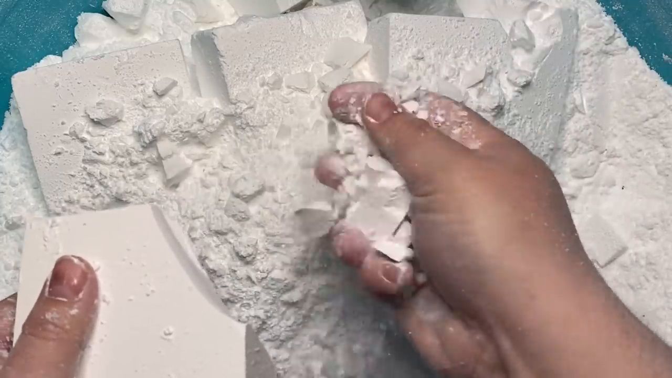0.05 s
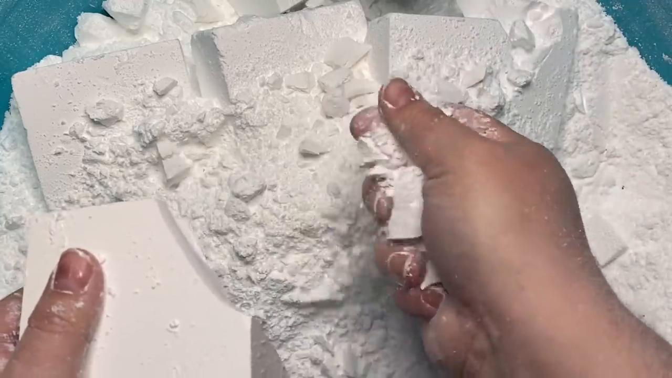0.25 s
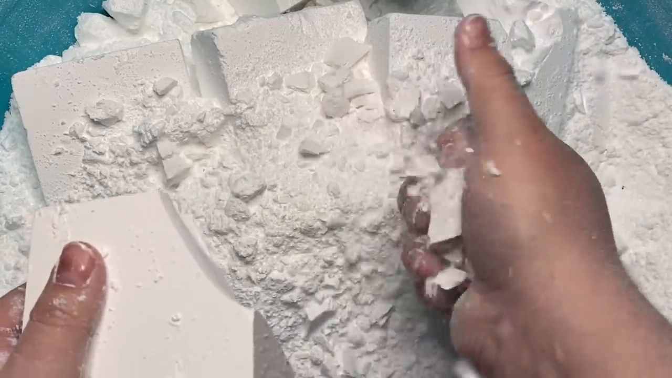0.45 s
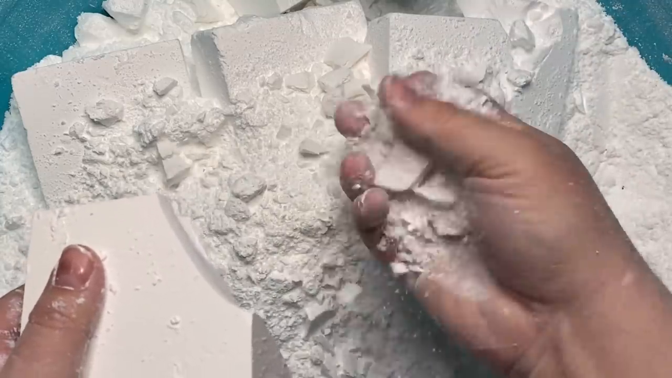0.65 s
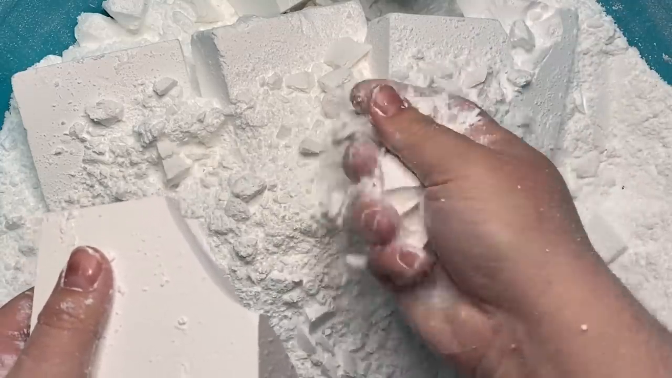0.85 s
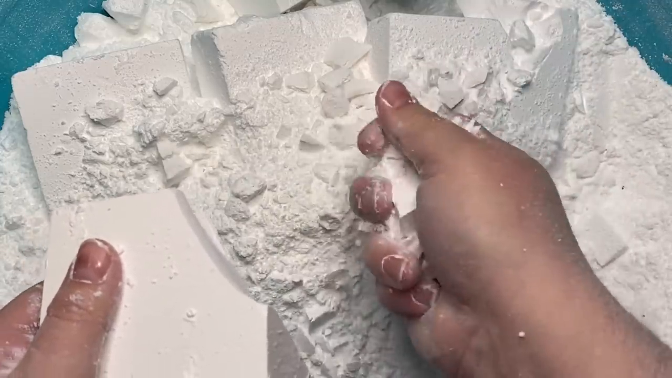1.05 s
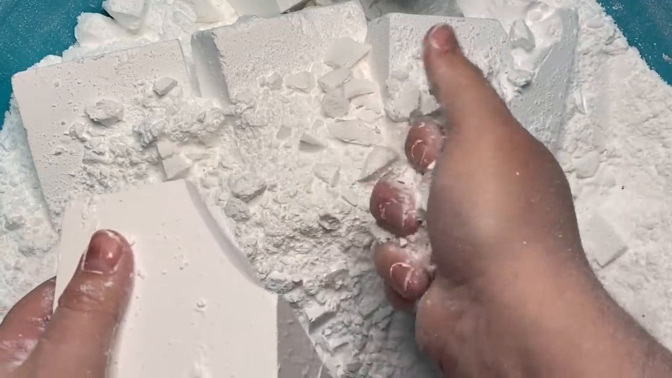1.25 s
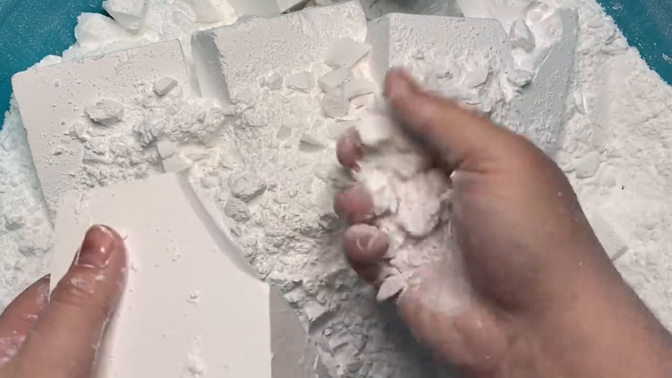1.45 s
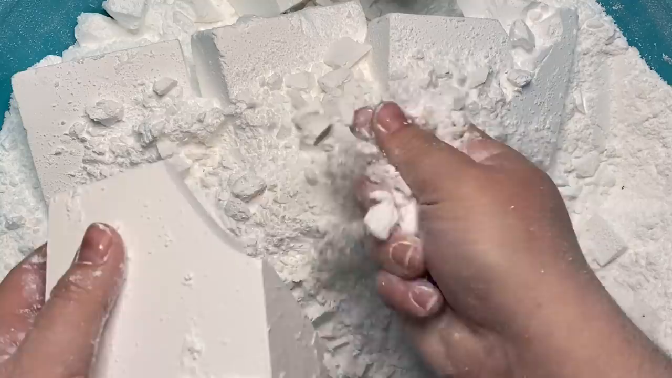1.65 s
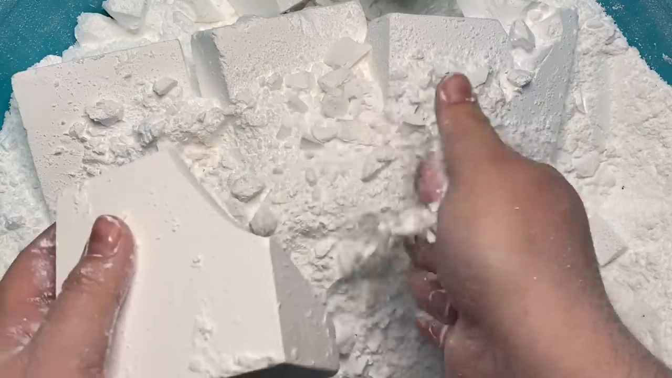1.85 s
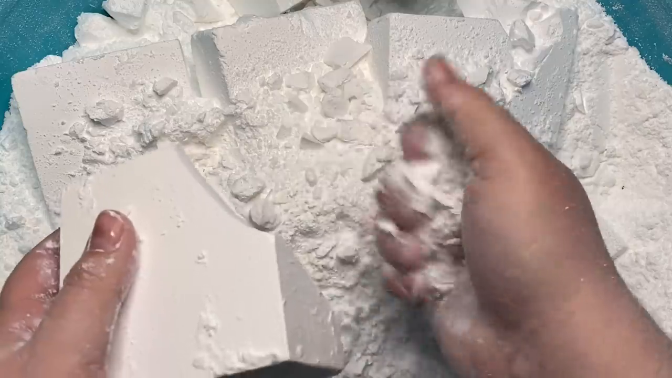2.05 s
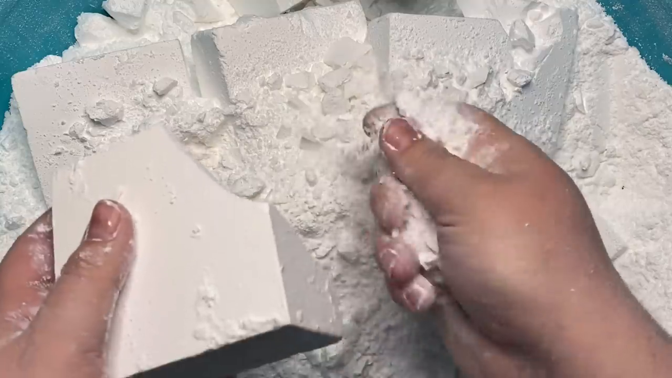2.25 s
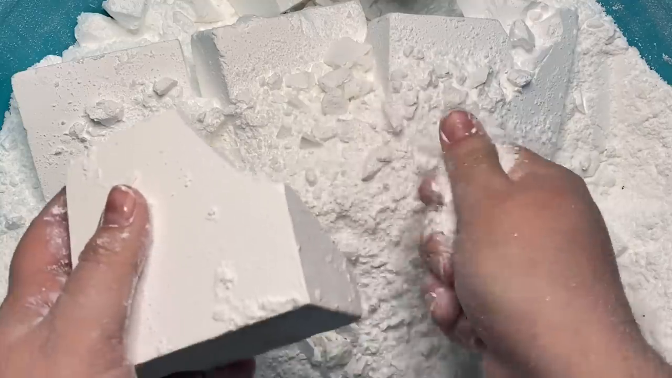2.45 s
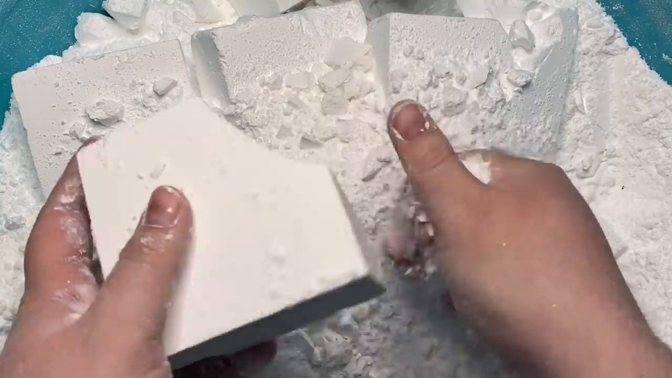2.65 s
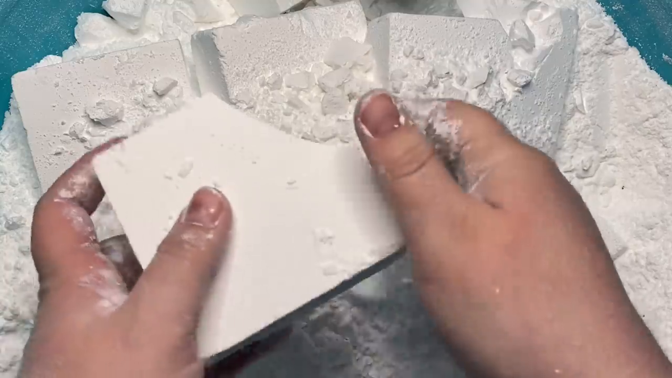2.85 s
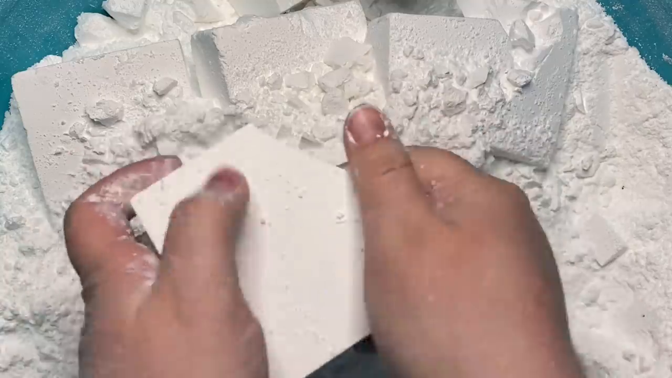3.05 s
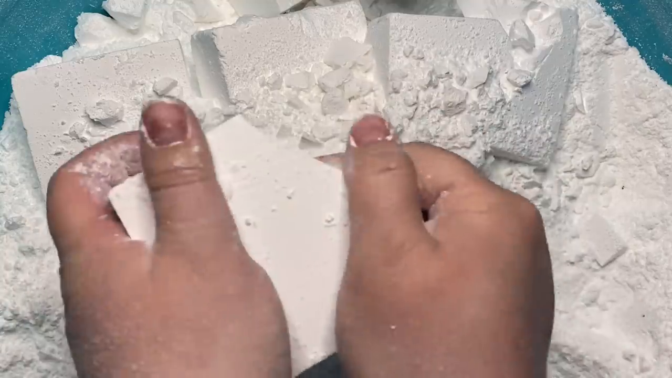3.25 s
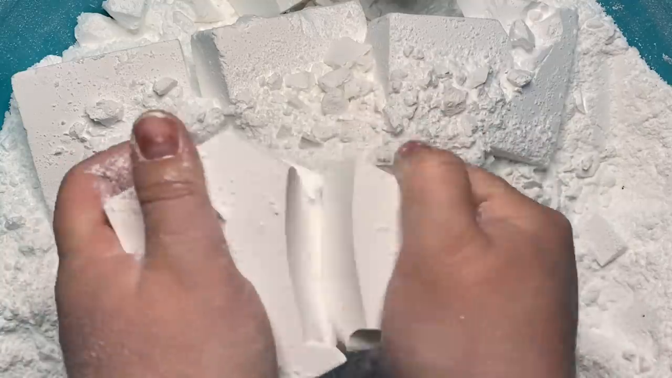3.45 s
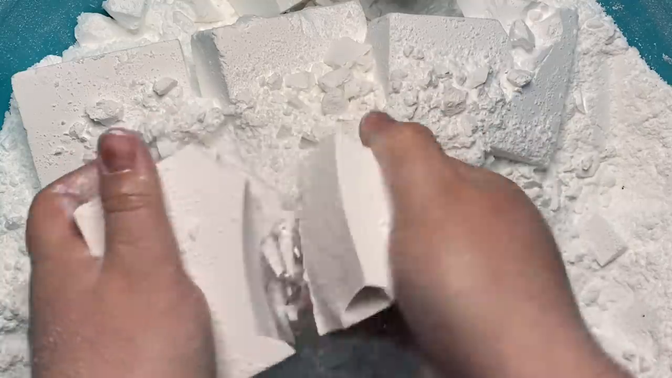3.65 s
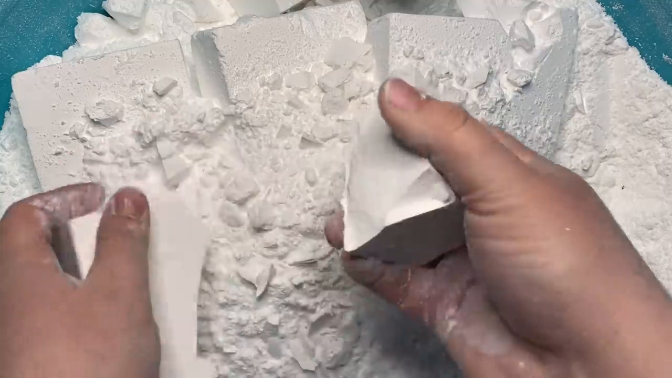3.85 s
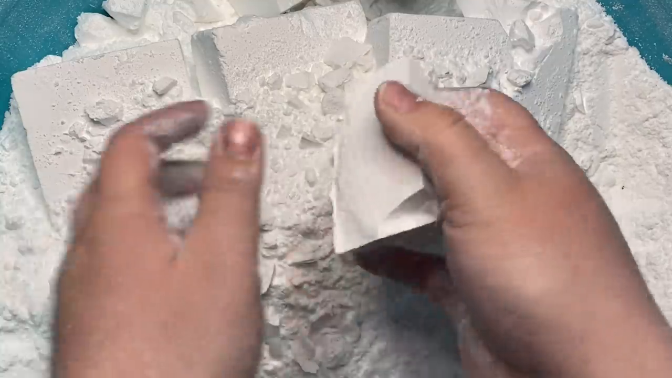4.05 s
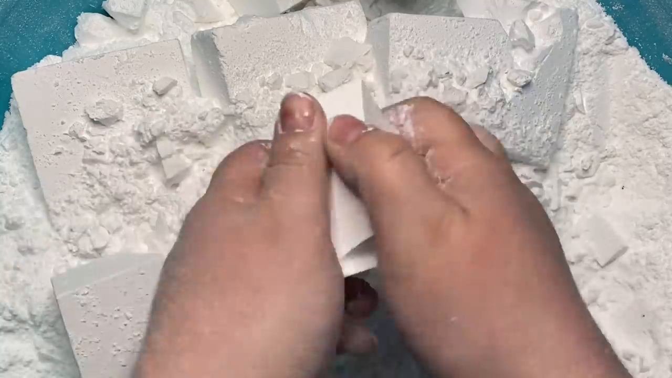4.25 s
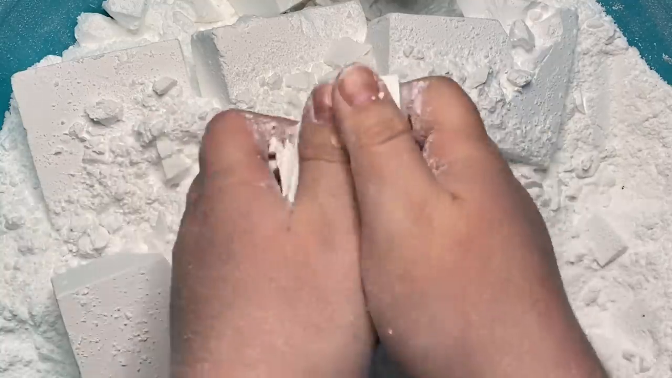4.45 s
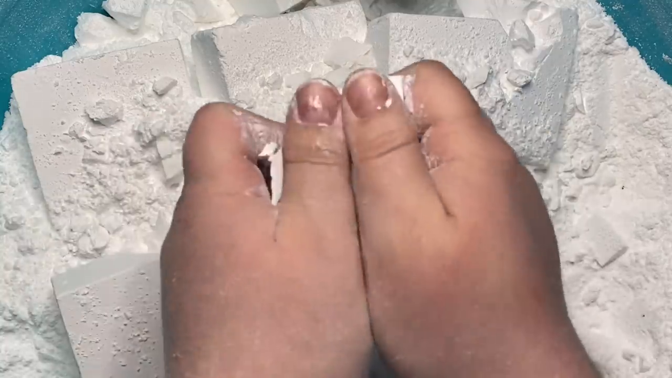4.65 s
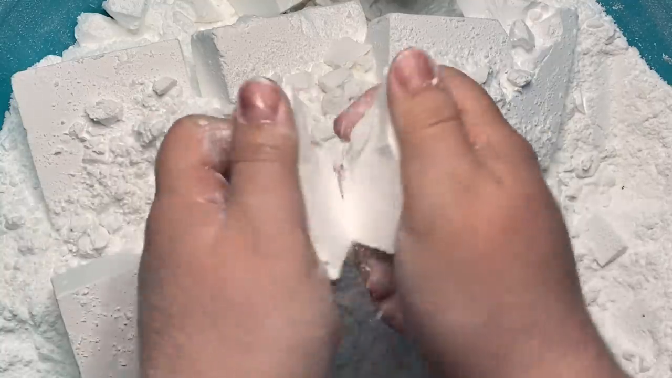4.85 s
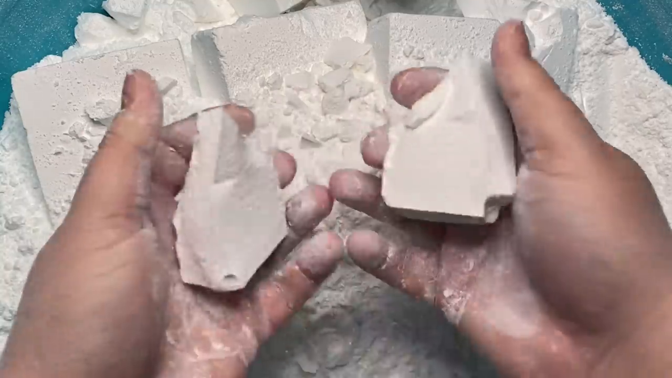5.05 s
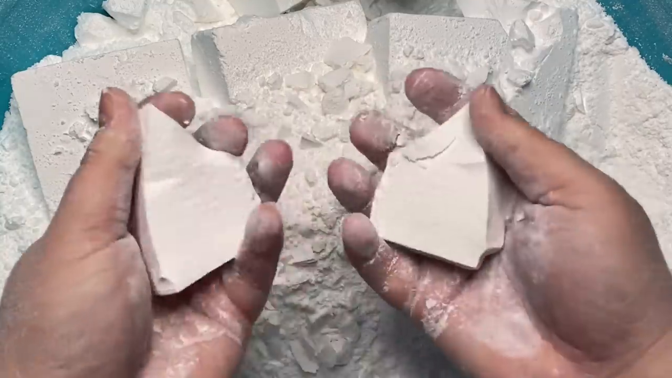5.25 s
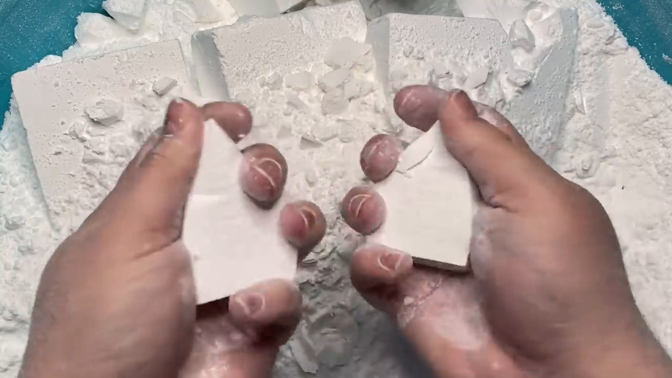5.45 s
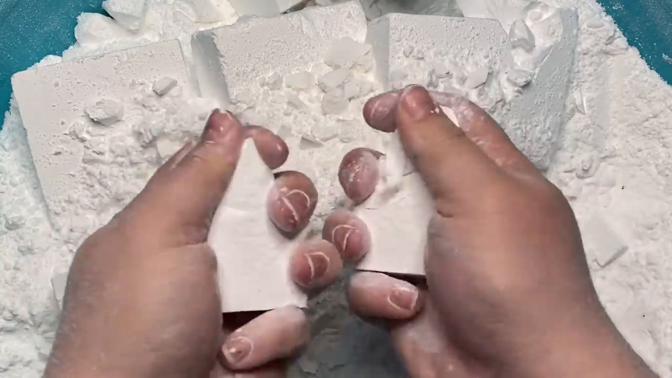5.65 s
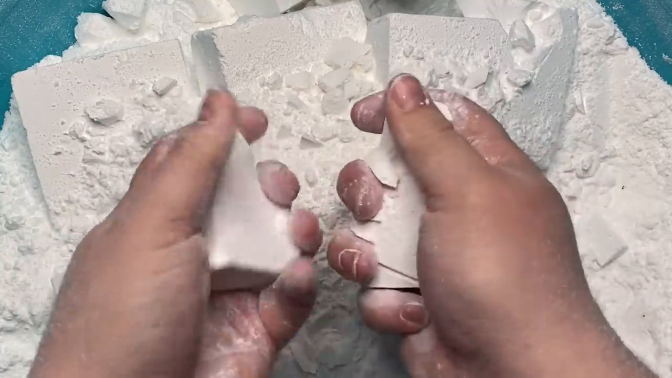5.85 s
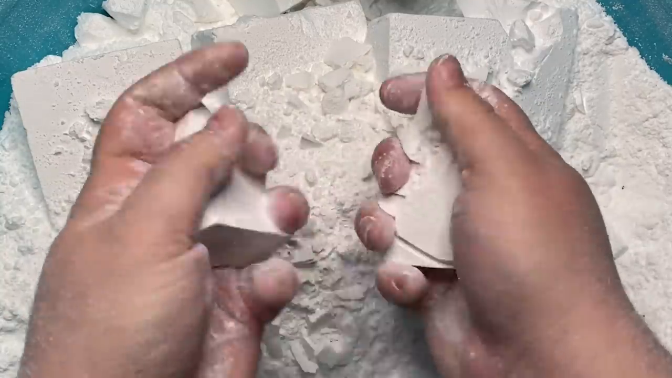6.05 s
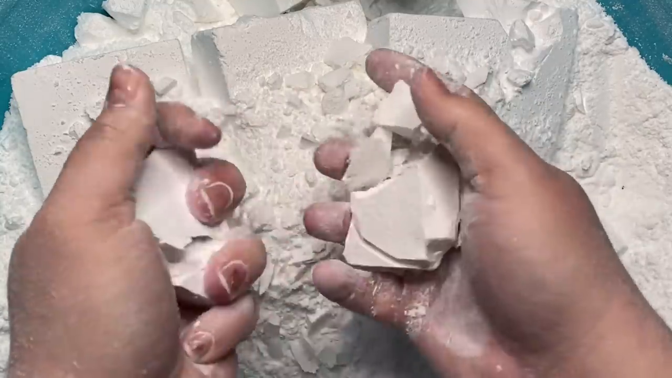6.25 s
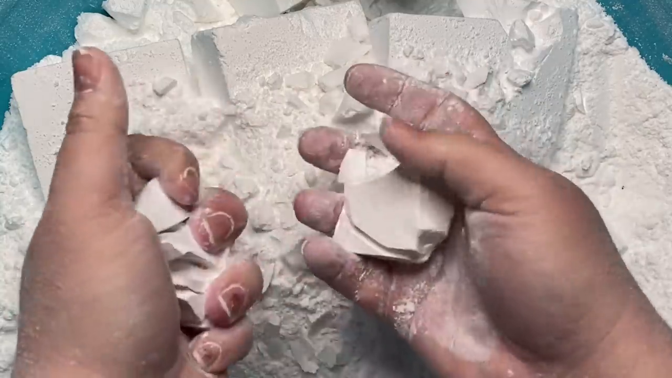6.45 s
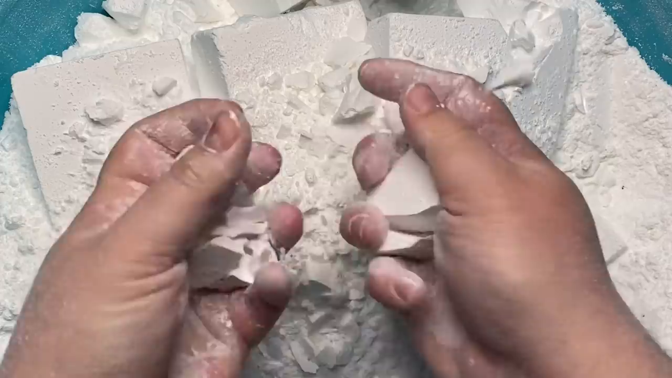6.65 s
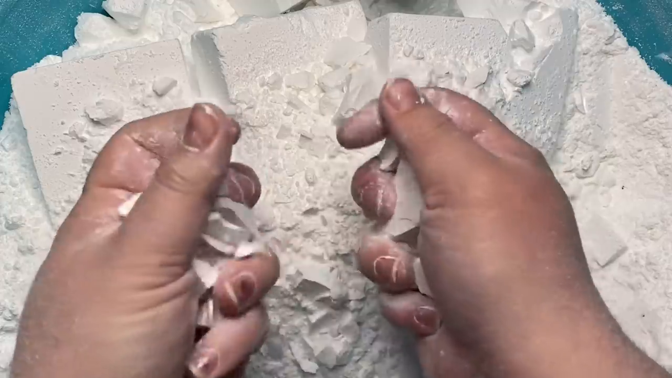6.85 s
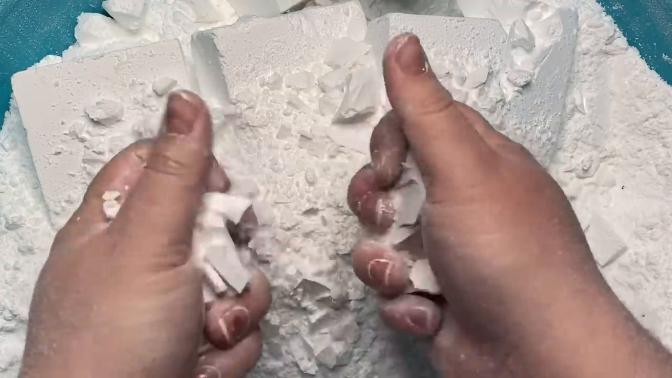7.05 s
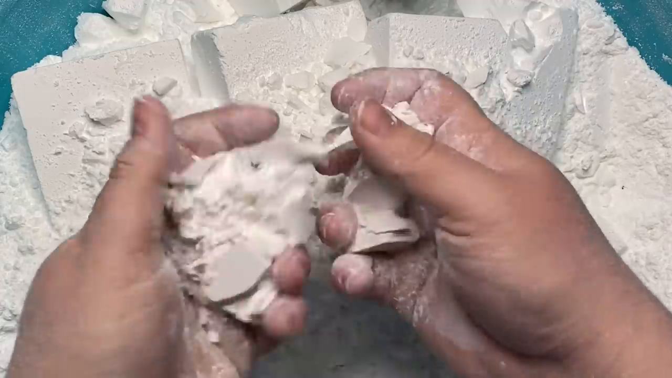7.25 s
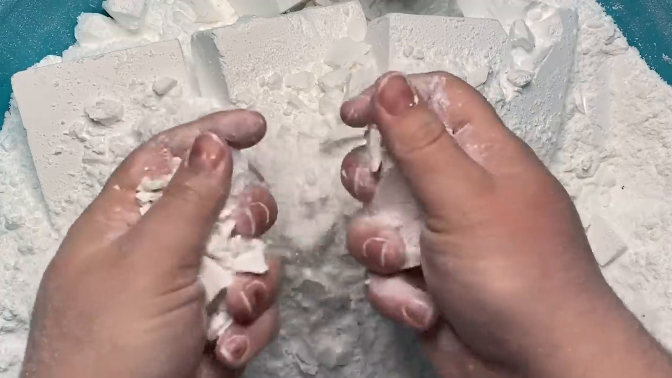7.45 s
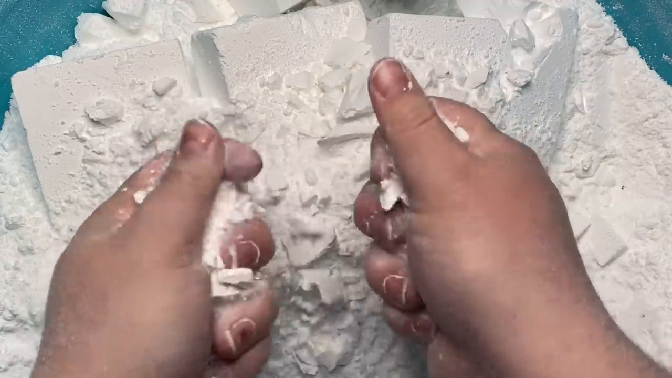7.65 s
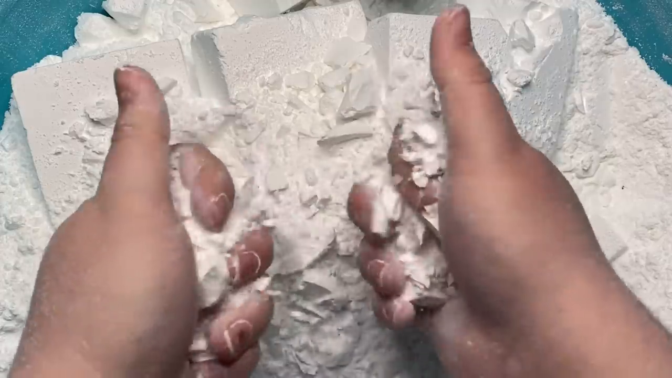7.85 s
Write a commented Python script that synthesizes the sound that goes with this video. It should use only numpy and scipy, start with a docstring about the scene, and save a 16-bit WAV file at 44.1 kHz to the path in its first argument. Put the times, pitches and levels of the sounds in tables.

```python
"""Lumps of gym chalk crack and crumble in the fist right at the microphone, over a tub of powder in a room.
A crack is a snap, a noise burst and a ringing fragment; crumbs are random clicks over powder noise.
Whole pieces tear and flex as they break; rubbed faces hiss and sing; bumps are low decaying sines.
Hands rumble and rustle, tub and room ring on, faint air hums behind. Loud breaks clip at the microphone."""
import sys
import numpy as np
from scipy import signal
from scipy.fft import rfft, irfft, next_fast_len
from scipy.io import wavfile
from scipy.ndimage import uniform_filter1d, map_coordinates

SR = 44100
rng = np.random.default_rng(int(sys.argv[2]) if len(sys.argv) > 2 else 0)


def unload_wav(signal):
    """Save mono or channel-first audio to the path in sys.argv[1] as 16-bit WAV at rate SR, clipped to [-1, 1]."""
    wavfile.write(
        sys.argv[1],
        SR,
        np.round(np.clip(np.atleast_2d(signal).T, -1, 1) * 32767).astype(np.int16),
    )


N = 348831

# Loud cracks of lumps. Each row: time in seconds, energy over 1 ms in dB, length in seconds before stretching,
# ring of the fragment in Hz, knock in dB and splinters in dB relative to the middle band.
CRACKS = [(.08, -12, 0.0005, 660, 11, -1), (.16, -15, .0012, 3200, -4, -5),
          (0.1657, -13.5, .0005, 7150, 4, 5), (0.1793, 2.5, 0.00085, 3070, -11.5, -9),
          (0.204, -13.5, .0038, 3450, -16, -3), (.2102, -7.5, .0006, 7060, -5.5, -5),
          (.611, -11, 0.0028, 1090, 8, 0), (0.6416, -4.5, 0.0017, 1440, -3.5, -19),
          (0.7337, -8, 0.00051, 2040, -7, -11), (0.7502, -14.5, 0.00056, 1880, 0, -9),
          (.772, -12.5, .0004, 1450, -3, -2), (.82, -10, 0.00036, 7500, -8, -3),
          (0.855, -11, 0.00046, 2490, -11, -3), (0.8673, -5, 0.0005, 1900, -10, -12.5),
          (.884, -6.5, 0.00088, 8350, -1, 6), (.8981, -6.5, .0002, 5060, -18, -6),
          (0.9062, -8, .0004, 3360, -23, 9), (0.9245, -3.5, .0058, 3400, -16, -10),
          (.96, -4.5, .0025, 3970, -23, 7), (.964, -6, 0.00058, 5100, -23, -25),
          (1.0133, -3, 0.0015, 3960, -9, -1.5), (1.0364, -4.5, .0014, 6630, -1, -12),
          (1.0652, -20, .0004, 2220, -18, -6), (1.164, -21.5, .0008, 580, 5, -21),
          (1.442, -15, 0.00019, 2960, 6, -15), (1.524, -8.5, 0.0008, 6250, -10, -15),
          (1.574, -12.5, .0012, 1530, -8, -13), (1.626, -7, .0014, 1370, 2, -18),
          (1.6647, -13.5, 0.0013, 600, 8, -3), (1.8447, -21, 0.0022, 1160, -25, -6),
          (2.0692, -14, 0.0014, 4940, -6, 6.5), (2.2082, -4.5, .0008, 3460, -3.5, -7),
          (2.3352, -21, 0.00069, 3450, 4, 2.5), (2.3805, -15.5, 0.00035, 8200, -3.5, -3),
          (2.829, -23.5, 0.0017, 735, 9, 2), (3.171, -31.5, .0005, 2600, -20, -13),
          (3.3002, -1, 0.0012, 3090, -20, -4), (3.3362, -23, .0005, 4360, -12, 9),
          (3.361, -14.5, .0005, 6300, -22, 4), (3.416, -18.5, 0.00098, 3180, -10, -6),
          (3.5579, -10, 0.0069, 3430, 2, -5), (3.7428, -8, 0.0017, 770, 4.5, -1.5),
          (4.3895, -17, 0.0012, 6730, 0, 12), (4.4061, -14.5, .0014, 3220, 3, 4),
          (4.466, -17.5, .0025, 2450, -22, -4), (4.635, -22, .0006, 10100, -12, 5),
          (4.9027, -32, .0008, 2200, -2, -18), (4.9385, -29.5, .001, 2900, -6, -17),
          (4.9657, -22, 0.00042, 3540, -14, -19), (5.337, -9, 0.0015, 430, -2.5, 2),
          (5.3785, -5, 0.00062, 6230, -23, 1.5), (5.3897, -5, .0007, 1350, 1.5, -12),
          (5.47, -1, 0.0039, 3800, -2.5, -5), (5.4745, -1.5, .0009, 3780, 2.5, 6.5),
          (5.4944, -15, .0003, 6880, -7, 1), (5.5565, -3, 0.0014, 5060, -7, -4),
          (5.5782, -4.5, .0007, 3400, -25, 3), (5.5864, -8, .0006, 4320, -24, 6),
          (5.612, -9.5, 0.001, 567, -0.5, -2.5), (5.6491, -15.5, .0006, 6550, -19, 6),
          (5.7132, -12, 0.00019, 6600, -7.5, 0), (5.9817, -4.5, 0.0014, 3420, -19, -4),
          (6.1097, -8, .0011, 2270, -10, -4), (6.2283, -2.5, 0.0037, 8260, -29, 7.5),
          (6.236, -14.5, .0004, 6600, -15, -1), (6.3366, -22, 0.00088, 3480, -19, -1),
          (6.4382, -8, 0.0016, 624, 3.5, 3), (6.4963, -15, 0.00029, 7100, -21, 4),
          (6.5098, -13.5, 0.00051, 7400, -5, -4), (6.5347, -13, 0.00046, 7700, -13, -2),
          (6.5974, -15.5, 0.00044, 6600, -19, 0), (6.6683, -10, 0.003, 6770, -14, 1),
          (6.6884, -6.5, 0.0016, 395, -6, 2), (6.7045, -7.5, .0006, 3570, -4, 3),
          (6.7209, -3, .0007, 7550, -21, 10), (6.757, -3, 0.0027, 4880, -5, 1),
          (6.7745, 1, 0.0013, 1980, -2, -21), (6.7791, -3, .0012, 5640, -24, -4),
          (6.8824, -4, 0.0013, 6380, -17, 1.5), (6.8925, -13.5, 0.0021, 7000, -9, 2),
          (7.2034, -7.5, 0.00025, 6240, -8.5, 2), (7.2225, -10, .0005, 3180, -6, 6),
          (7.2522, -2.5, 0.00096, 3980, -1.5, 8.5), (7.288, -9.5, .0011, 7500, -19, 0),
          (7.3201, -9, .003, 4000, -4.5, -4), (7.341, -6.5, 0.00041, 5940, -4, -15),
          (7.3575, -8, 0.00065, 3600, -6, -16), (7.395, -4, 0.0018, 3130, -16, -4),
          (7.4309, -4, 0.0019, 7500, -16, 4.5), (7.4684, -9, .0004, 10200, -8, 6),
          (7.5293, -11.5, .0004, 7100, -7, 14), (7.5619, -12, 0.00064, 1400, -5, 3),
          (7.6002, -5, 0.0022, 7650, -4.5, 2.5), (7.6715, -18.5, 0.00028, 7600, -17, -2)]
# Whole pieces breaking through. Each row: time in seconds, run of the fracture in seconds, tearing in dB,
# flexing pitch in Hz, flexing in dB, jolt of the hands in dB.
BREAKS = [(3.2365, 0.0054, -0.5, 446, 16, -3), (4.5091, 0.0047, -7.5, 418, 10.5, -22),
          (5.9662, 0.0017, -8.5, 480, -6, -32), (5.9687, 0.0024, -2, 496, -0.5, -21),
          (6.1247, 0.00061, -13, 477, -9, -34), (6.1263, 0.0038, -4, 2860, 4, -35),
          (6.7342, 0.0059, -3.5, 2000, -27, -14)]
# Soft bumps of hands and chalk on the tub. Each row: time in seconds, peak in dB, pitch in Hz, T60 in seconds.
BUMPS = [(2.209, -13, 260, 0.013), (2.756, -15, 75, 0.12), (3.2434, -21, 45.5, 0.12),
         (3.631, -13, 109, 0.024), (3.762, -13.5, 37, 0.7), (3.771, -8, 63, 0.13), (3.961, -28, 38.5, 0.76),
         (4.514, -4.5, 480, 0.013), (4.519, -17, 72, 0.069), (5.389, -16.5, 106, 0.047),
         (6.139, -23.5, 117.5, 0.25), (6.16, -24, 45, 0.37), (6.436, -21, 127, 0.039),
         (6.775, -18, 191, 0.13)]
# Spectrum of crumbling and tearing chalk. Each row: frequency in Hz, density in dB.
CRUMB_COLOUR = [(400, -3), (750, -3.5), (1300, 0), (2200, 0), (3300, 0), (5500, -3.5), (7700, -0.5),
                (9200, -13.5), (12500, -9.5), (16000, -18)]
# Spectrum of the rubbing hiss. Each row: frequency in Hz, density in dB.
RUB_COLOUR = [(1500, -20), (4500, -16), (5500, -11), (7500, -1.5), (9200, -7), (11000, -5.5), (16000, -10)]
# Spectrum of the hand rumble. Each row: frequency in Hz, density in dB.
RUMBLE_COLOUR = [(20, -9.5), (36, 3), (65, 1), (120, -1.5), (200, -16), (400, -41)]
# Spectrum of the muffled rustle in the fist. Each row: frequency in Hz, density in dB.
RUSTLE_COLOUR = [(120, -8.5), (220, 0), (420, -1.5), (750, -7), (1300, -21.5), (2500, -22.5)]
# Spectrum of the room air. Each row: frequency in Hz, density in dB.
AIR_COLOUR = [(25, 6), (65, 7.5), (130, -15.5), (250, -16), (420, -10), (600, -16), (1000, -63),
              (3000, -17.5), (16000, -43)]
# Spectrum of the diffuse room tail. Each row: frequency in Hz, density in dB.
ROOM_COLOUR = [(80, 2), (350, -12.5), (700, 1.5), (950, -14), (1500, 2.5), (3000, 4.5), (7500, 4),
               (16000, 4)]
# Modes of a rubbed slab. Each row: frequency in Hz, relative level in dB.
SLAB_MODES = [(5220, -10), (5900, -8), (6500, -4), (7200, -1), (7700, -2), (8200, -2), (8750, -7),
              (10200, -8), (11250, -8), (12650, -9), (14500, -10)]
# Strokes that make a piece sing or scuff. Each row: start in seconds, end in seconds, pitch in Hz,
# nominal width in Hz, RMS in dB.
STROKES = [(2.82, 2.904, 3590, 170, -41), (3.643, 3.832, 330, 247, -36), (3.676, 3.788, 620, 110, -33.5),
           (3.687, 3.779, 2000, 1400, -38), (3.736, 3.88, 7130, 170, -39.5), (4.376, 4.45, 7300, 160, -46),
           (4.746, 4.859, 5190, 100, -50), (4.752, 4.82, 7400, 400, -42), (4.848, 5.03, 8050, 200, -50.5),
           (5.686, 5.74, 3600, 400, -44), (5.97, 6.05, 2930, 400, -38)]
# Level of the hollow hum. Each row: time in seconds, level in dB.
HUM = [(0, -55.5), (2.0, -59), (2.6, -53), (3.1, -81), (4.0, -65.5), (4.4, -50.5), (5.25, -51.5),
       (5.45, -69), (7.91, -56)]
# Ring of the tub. Each row: frequency in Hz, relative energy in dB, T60 in seconds.
TUB_MODES = [(321, -22.5, 0.27), (384, -25, 0.27), (958, -14.5, 0.38), (1070, -10, 0.29), (2800, -21, 0.14)]
# Squeezes of the fist. Each row: start of hold in seconds, end of hold in seconds, coarse crumbs in dB,
# fine powder in dB relative to them.
SQUEEZES = [(.0, 0.122, -36, -5.5), (0.168, 0.205, -29, -2), (.33, .4, -40, -6.5),
            (.51, 0.693, -35.5, -5.5), (0.748, 0.804, -32, -1), (0.865, 0.982, -32.5, -4),
            (0.999, 1.079, -36, -3), (1.16, 1.216, -49.5, -7), (1.379, 1.453, -33, -7),
            (1.5, 1.53, -37.5, -5.5), (1.574, 1.689, -33, -4), (1.72, 1.776, -39.5, -9),
            (1.89, 1.919, -45, -10), (2.013, 2.086, -37, -5), (2.178, 2.223, -35.5, -6),
            (2.265, 2.445, -41, -6), (3.267, 3.275, -35, -5), (3.411, 3.444, -38, -4.5),
            (4.394, 4.422, -42, -9), (5.338, 5.4, -45, -1), (5.465, 5.541, -43, -2),
            (5.546, 5.62, -40.5, 1.5), (5.707, 5.705, -40, 4), (5.97, 6.025, -35.5, -11),
            (6.116, 6.184, -32.5, -2), (6.23, 6.27, -41.5, -2), (6.395, 6.6, -38.5, 1),
            (6.666, 6.704, -31.5, 1), (6.736, 6.776, -23.5, 0), (6.8, 6.89, -40, 2.5),
            (6.988, 7.009, -44.5, 2.5), (7.145, 7.197, -35.5, 0), (7.212, 7.3, -30, 3.5),
            (7.33, 7.42, -26.5, 2), (7.46, 7.61, -32, 2), (7.645, 7.698, -37.5, 3),
            (7.883, 7.91, -38.5, -1.5)]
# Loose crumbs between squeezes, least while the hands hold a solid slab. Each row: time in seconds, level in dB.
LOOSE_CRUMBS = [(0, -49.5), (2.4, -49), (2.9, -53), (3.2, -63), (3.5, -51.5), (3.95, -67.5), (4.3, -58.5),
                (5.8, -52), (6.3, -50.5), (7.9, -42.5)]
# Dry skin sliding on a solid face. Each row: start of hold in seconds, end of hold in seconds, hiss in dB,
# singing in dB relative to the hiss.
RUBS = [(2.476, 2.537, -45.5, -7), (2.673, 2.724, -45, -1.5), (2.75, 2.798, -38, -2.5),
        (2.85, 2.878, -36.5, -2.5), (2.985, 2.991, -38, -7), (3.04, 3.117, -51.5, -1),
        (3.36, 3.49, -45.5, -8), (3.54, 3.57, -39, 0), (3.61, 3.68, -44.5, 2), (3.696, 3.833, -42, -2),
        (3.88, 3.969, -49.5, 1.5), (4.059, 4.159, -44, -0.5), (4.198, 4.239, -37.5, -4),
        (4.313, 4.349, -40.5, -1), (4.39, 4.425, -48, -4), (4.55, 4.615, -53, -5),
        (4.772, 4.803, -34, -0.5), (4.835, 4.91, -49.5, 1.5), (4.97, 5.01, -46, -1), (5.06, 5.097, -46, 0),
        (5.153, 5.29, -54, -2), (5.687, 5.726, -38.5, -3), (5.893, 6.04, -41, 0), (6.418, 6.58, -47, -6)]
# Shifts of the grip. Each row: start of hold in seconds, end of hold in seconds, rumble in dB, rustle in dB.
GRIP_SHIFTS = [(0, .1, -40.5, -44), (0.534, 0.965, -38, -43), (1.19, 1.366, -38.5, -47),
               (1.5, 2.4, -40.5, -49), (2.618, 3.053, -40.5, -47.5), (3.66, 3.733, -34.5, -42),
               (6.16, 6.357, -35.5, -47), (6.5, 7.11, -42.5, -50.5), (7.275, 7.636, -36.5, -49),
               (7.887, 7.91, -34.5, -43)]

KNOCK_HZ, SPLINTER_HZ, CUTOFF_HZ = 1300, 5590, 16000  # lower and upper band splits, top of the sound
SQUEEZE_ATTACK_S, SQUEEZE_RELEASE_S = 0.025, 0.028  # time constants, as below
RUB_ATTACK_S, RUB_RELEASE_S = 0.017, 0.015
GRIP_ATTACK_S, GRIP_RELEASE_S = 0.11, 0.055
STILL_RUMBLE_DB, STILL_RUSTLE_DB = -48, -53
AIR_DB, ROOM_DB, TUB_DB = -52, -18.5, -8  # the tub is relative to the diffuse tail
ROOM_T60_S = 0.26
HUM_HZ, HUM_WIDTH_HZ = 424, 115  # width of each of two passes


def cracks(rows, snap_db=-3, ring_db=-5, free_ring=0.23, ring_cycles=16, stretch=1.44,
           debris_db=-22, debris_s=0.0067, top_db=-6, lead_in_db=-19, lead_in_s=0.00098, size=1400):
    """A sharp snap and a burst of tiny ruptures; the fragment rings a few cycles and debris trails behind."""
    out, t = np.zeros(N), np.arange(size) / SR
    for s, db, length_s, hz, knock_db, splinter_db in rows:
        envelope = np.exp(-t / (stretch * length_s)) + from_db(debris_db) * np.exp(-t / debris_s)
        ruptures = rng.standard_normal(size) * from_db(6.4 * rng.standard_normal(size))
        burst = unit_energy(ruptures * envelope)
        burst[0] += from_db(snap_db) * np.sign(rng.standard_normal())
        knock = unit_energy(band(burst, 197, KNOCK_HZ, order=3))
        middle = unit_energy(band(burst, KNOCK_HZ, SPLINTER_HZ, order=3))
        top = from_db(top_db) * band(burst, 10300, 13540)
        splinters = unit_energy(band(burst, SPLINTER_HZ, 7830, order=3) + top)
        crack = unit_energy(from_db(knock_db) * knock + middle + from_db(splinter_db) * splinters)
        # small fragments ring for more cycles than big ones, which the hand damps
        ring_t60_s = ring_cycles / np.sqrt(hz * KNOCK_HZ * 2)
        fragment = unit_energy(ring(t, hz, ring_t60_s))
        # a chip that flies free knocks little and rings all the more
        fragment_db = ring_db - free_ring * min(knock_db, 0)
        strength = from_db(db) * np.sqrt(SR / 1000)  # energy over 1 ms
        add(out, s, strength * unit_energy(crack + from_db(fragment_db) * fragment))
        # a very short, faint noise swell leads into each crack
        swell = np.exp(-t[::-1] / lead_in_s)
        lead_in = unit_energy(band(rng.standard_normal(size), 2700, 8000) * swell)
        add(out, s - size / SR, strength * from_db(lead_in_db) * lead_in)
    return out


def small_cracks(pressure, per_s=34, hard_db=-31, above_db=13, spread_db=2.5, length_s=0.00078,
                 knock_db=-9, splinter_db=0, count=400):
    """Lesser lumps give way at random, more often (up to a limit) and louder under pressure; rows as in CRACKS."""
    rows, pitches_hz = [], np.geomspace(1500, 8000, num=100)
    uniform, normal = rng.random((count, 3)), rng.standard_normal((count, 4))
    for (when, chance, pitch), (loud, long, knock, splinter) in zip(uniform, normal):
        force = pressure[int(when * N)]
        rate_per_s = per_s * min(np.sqrt(force / from_db(hard_db)), 1)
        if chance < rate_per_s * N / SR / count:
            db = 20 * np.log10(force) + above_db + spread_db * loud
            rows.append((when * N / SR, db, length_s * np.exp(.5 * long), pitches_hz[int(pitch * 100)],
                         knock_db + 6 * knock, splinter_db + 5 * splinter))
    return rows


def breaks(flex_t60_s=0.012, tear_t60_s=0.015, jolt_hz=62, jolt_t60_s=0.04,
           body_db=-9, body_t60_s=0.03, size=8000):
    """A fracture tears through the piece; the freed halves flex and jolt the hands."""
    out, t = np.zeros(N), np.arange(size) / SR
    for s, run_s, tear_db, flex_hz, flex_db, jolt_db in BREAKS:
        tear = noise(CRUMB_COLOUR, size=size) * fade(np.maximum(t - run_s, 0), tear_t60_s)
        body = rms_one(band(rng.standard_normal(size), 255, 1200)) * fade(t, body_t60_s)
        flex = ring(t, flex_hz, flex_t60_s) + from_db(body_db) * body
        jolt = ring(t, jolt_hz, jolt_t60_s)
        add(out, s, from_db(tear_db) * tear + from_db(flex_db) * flex + from_db(jolt_db) * jolt)
    return out


def crumbs(coarse, fine, sliding, per_s=2800, hard_db=-33, colour_db=4, clump_db=2.0):
    """Countless grains burst at random, each with its own size and colour, over a haze of powder."""
    # powder that slides hisses instead of bursting
    haze = .07 + .6 * sliding
    # a harder squeeze breaks more grains; a light one leaves separate ticks
    crowding = np.clip(coarse / from_db(hard_db), .2, 2)
    born = rng.random(N) < per_s * crowding / SR
    sizes = from_db(5 * np.minimum(rng.exponential(1, N), 3.6))
    clicks = born * sizes / np.sqrt(crowding)
    clumps = from_db(clump_db * drift(90))
    powder = np.sqrt(haze) * rng.standard_normal((2, N))  # bands take turns with two noises
    edges_hz = np.geomspace(400, CUTOFF_HZ, num=15)
    low, high = np.zeros(N), np.zeros(N)
    for k, (low_hz, high_hz) in enumerate(zip(edges_hz, edges_hz[1:])):
        # each grain draws its own gain and sign in each band
        luck = rng.uniform(-0.97, 1, N)[born]
        strengths = np.zeros(N)
        strengths[born] = from_db(colour_db * 4 * np.abs(luck)) * np.sign(luck)
        grains = np.sqrt(1 - haze) * rms_one(clicks * strengths) + powder[k % 2]
        centre_hz = np.sqrt(low_hz * high_hz)
        gain = from_db(at_hz(CRUMB_COLOUR, centre_hz))
        part = gain * band(grains * clumps, low_hz, high_hz, order=3)
        if centre_hz < SPLINTER_HZ:
            low += part
        else:
            high += part
    return coarse * rms_one(low) + fine * rms_one(high)


def rubbing(hiss_gain, sing_gain, width_hz=330, wander_db=4, judder_db=2.2, bend=.015):
    """Dry skin hisses along the chalk; its modes come and go and shift in pitch with the grip."""
    friction = rng.standard_normal(N)
    sing = np.zeros(N)
    for hz, db in SLAB_MODES:
        sing += from_db(db + wander_db * drift(7.2)) * double_resonance(friction, hz, width_hz)
    # reading at an uneven speed bends the pitch
    sing = map_coordinates(sing, [np.cumsum(1 + bend * drift(7.6))], order=5, mode="mirror")
    sing = sing / np.sqrt(uniform_filter1d(sing ** 2, size=2200))  # level over 50 ms
    judder = rms_one(from_db(judder_db * drift(120)))
    return (hiss_gain * noise(RUB_COLOUR) + sing_gain * sing) * judder


def strokes(judder_db=5.5):
    """Friction feeds one resonance of the piece for the length of a stroke."""
    out = np.zeros(N)
    friction = rng.standard_normal(N) * from_db(judder_db * drift(80))
    for start_s, end_s, hz, width_hz, db in STROKES:
        push = friction[round(start_s * SR):round(end_s * SR)]
        tone = double_resonance(push, hz, 2 * width_hz)
        add(out, start_s, from_db(db) * rms_one(tone * signal.windows.tukey(len(push), .7)))
    return out


def bumps(size=16000):
    """The powder bed damps each bump to a low thud."""
    out, t = np.zeros(N), np.arange(size) / SR
    for s, db, hz, t60_s in BUMPS:
        add(out, s, -from_db(db) * ring(t, hz, t60_s))
    return out


def hands(pressure, muffled_db=-11, lumpy_db=3):
    """Moving hands rumble, and the chalk shifting or squeezed inside the fist is muffled."""
    rumble_rows = [(start, end, db) for start, end, db, _ in GRIP_SHIFTS]
    rustle_rows = [(start, end, db) for start, end, _, db in GRIP_SHIFTS]
    rumble = gestures(rumble_rows, GRIP_ATTACK_S, GRIP_RELEASE_S)
    rustle = gestures(rustle_rows, GRIP_ATTACK_S, GRIP_RELEASE_S)
    rumble = np.hypot(rumble, from_db(STILL_RUMBLE_DB))
    rustle = np.hypot(np.hypot(rustle, from_db(STILL_RUSTLE_DB)), from_db(muffled_db) * pressure)
    lumpy = rms_one(noise(RUSTLE_COLOUR) * from_db(lumpy_db * drift(120)))
    return rumble * noise(RUMBLE_COLOUR) + rustle * lumpy


def close_up(x, dip_hz=760, dip_width_hz=190, dip=0.36, warm_hz=320, warm_width_hz=110, warm=0.14):
    """Microphone and a near reflection colour the chalk: a warm bump and a dip above it."""
    return x - dip * resonance(x, dip_hz, dip_width_hz) + warm * resonance(x, warm_hz, warm_width_hz)


def room(x, build_s=0.0022, treble_t60_s=0.16, tub_rough=1.1, size=20000):
    """A short diffuse tail that dies sooner in the treble, and the ring of the tub."""
    t = np.arange(size) / SR
    diffuse = noise(ROOM_COLOUR, size=size)
    bass = band(diffuse, 53, 2700, order=3) * fade(t, ROOM_T60_S)
    treble = band(diffuse, 2200, CUTOFF_HZ, order=3) * fade(t, treble_t60_s)
    tail = bass + treble
    tub = np.zeros(size)
    for hz, db, t60_s in TUB_MODES:
        # the powder lying in the tub roughens its ring
        rough = 1 + tub_rough * rms_one(band(rng.standard_normal(size), 15, 70))
        tub += from_db(db) * unit_energy(ring(t, hz, t60_s) * rough)
    # the diffuse part is scooped above the strong tub modes
    tail = tail - .5 * resonance(tail, 1450, 700)
    response = unit_energy(tail * (1 - np.exp(-t / build_s))) + from_db(TUB_DB) * tub
    return signal.fftconvolve(x, response)[:N]


def background():
    """Faint room air as coloured noise, with a wavering hollow hum as resonant noise."""
    hum = rms_one(double_resonance(rng.standard_normal(N), HUM_HZ, HUM_WIDTH_HZ))
    return from_db(AIR_DB) * noise(AIR_COLOUR) + from_db(in_time(HUM)[0]) * hum


def gestures(rows, attack_s, release_s):
    """Gain of hand movements (start, end, dB): each swells, holds and dies away; the strongest leads."""
    t = np.arange(0, N, 32) / SR
    each = []
    for start_s, end_s, db in rows:
        before, after = np.maximum(start_s - t, 0), np.maximum(t - end_s, 0)
        each.append(from_db(db) * np.exp(-before / attack_s - after / release_s))
    return np.interp(np.arange(N) / SR, t, np.max(each, axis=0))


def from_db(db):
    """Decibels to gain."""
    return 10 ** (np.asarray(db) / 20)


def rms_one(x):
    """Scale to RMS 1."""
    return x / np.sqrt(np.mean(x ** 2) + 1e-20)


def unit_energy(x):
    """Scale to a summed square of 1."""
    return x / np.sqrt(np.sum(x ** 2) + 1e-20)


def in_time(rows):
    """The columns of a curve, sample by sample."""
    s, *columns = np.transpose(rows)
    return [np.interp(np.arange(N) / SR, s, c) for c in columns]


def at_hz(points, hz):
    """Read a spectrum on a log-frequency axis."""
    points = np.array(points)
    return np.interp(np.log(hz + 1e-3), np.log(points[:, 0]), points[:, 1])


def band(x, low_hz, high_hz, order=2):
    """Causal band-pass."""
    edges_hz = [low_hz, min(high_hz, .45 * SR)]
    return signal.sosfilt(signal.butter(order, edges_hz, "band", fs=SR, output="sos"), x + 1e-18)


def resonance(x, hz, width_hz):
    """One two-pole resonance with gain 1 on top."""
    r = np.exp(-np.pi * width_hz / SR)
    zeros = np.array([1, 0, -1]) * (1 - r * r) / 2
    poles = [1, -2 * r * np.cos(2 * np.pi * hz / SR), r * r]
    return signal.lfilter(zeros, poles, x)


def double_resonance(x, hz, width_hz):
    """The same resonance twice in a row, for steeper skirts."""
    return resonance(resonance(x, hz, width_hz), hz, width_hz)


def noise(colour, size=N):
    """Noise of a given colour, RMS 1."""
    padded = next_fast_len(size)
    gain = from_db(at_hz(colour, np.fft.rfftfreq(padded, 1 / SR)))
    return rms_one(irfft(rfft(rng.standard_normal(padded)) * gain, padded)[:size])


def drift(rate_hz):
    """Random curve of RMS 1 with rate_hz straight segments a second."""
    knots = rng.standard_normal(N // 100)
    return rms_one(np.interp(np.arange(N) / SR * rate_hz, np.arange(len(knots)), knots))


def fade(t, t60_s):
    """Exponential decay by 60 dB in t60_s."""
    return np.exp(-np.log(1000) * t / t60_s)


def ring(t, hz, t60_s):
    """A struck mode: a decaying sine."""
    return np.sin(2 * np.pi * hz * t) * fade(t, t60_s)


def add(out, s, sound):
    """Mix a sound in at a time in seconds."""
    start = max(round(s * SR), 0)
    out[start:start + len(sound)] += sound[:max(N - start, 0)]


def scene(fine_gain_db=0.5, loose_fine_db=-4, rubbed_off_db=-15):
    """Squeezes crack and crumble the chalk, rubs hiss and shed a few crumbs, over the air of the room."""
    coarse_rows = [(start, end, db) for start, end, db, _ in SQUEEZES]
    fine_rows = [(start, end, db + fine_db) for start, end, db, fine_db in SQUEEZES]
    pressure = gestures(coarse_rows, SQUEEZE_ATTACK_S, SQUEEZE_RELEASE_S)
    powder = gestures(fine_rows, SQUEEZE_ATTACK_S, SQUEEZE_RELEASE_S)
    hiss_rows = [(start, end, db) for start, end, db, _ in RUBS]
    sing_rows = [(start, end, db + sing_db) for start, end, db, sing_db in RUBS]
    hiss = gestures(hiss_rows, RUB_ATTACK_S, RUB_RELEASE_S)
    sing = gestures(sing_rows, RUB_ATTACK_S, RUB_RELEASE_S)
    rub = np.hypot(hiss, sing)
    loose = from_db(in_time(LOOSE_CRUMBS)[0])
    crushing = np.hypot(pressure, loose)
    coarse = np.hypot(crushing, from_db(rubbed_off_db) * rub)
    fine = np.hypot(from_db(fine_gain_db) * powder, from_db(loose_fine_db) * loose)
    crumble = crumbs(coarse, fine, sliding=rub ** 2 / (rub ** 2 + crushing ** 2))
    friction = rubbing(hiss, sing) + strokes()
    fractures = cracks(CRACKS + small_cracks(crushing)) + breaks()
    chalk = close_up(fractures + crumble + friction)
    # bumps, hands and background bypass the room
    direct = bumps() + hands(pressure) + background()
    return (chalk + from_db(ROOM_DB) * room(chalk) + direct)[None, :]


def record(dry):
    """Loud breaks clip flat; a steep low-pass then cuts the top."""
    low_pass = signal.ellip(10, .1, 70, CUTOFF_HZ, fs=SR, output="sos")
    return signal.sosfilt(low_pass, np.clip(dry, -1, 1))


dry = scene()
out = record(dry)
unload_wav(out)
```